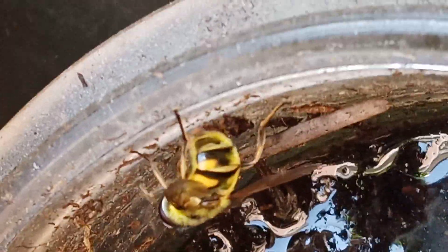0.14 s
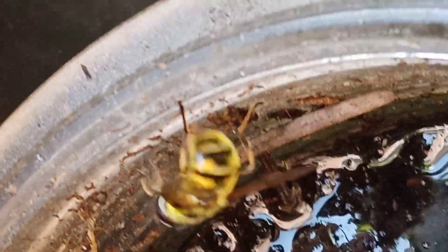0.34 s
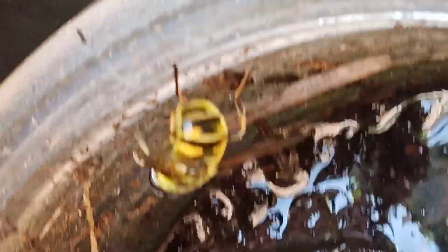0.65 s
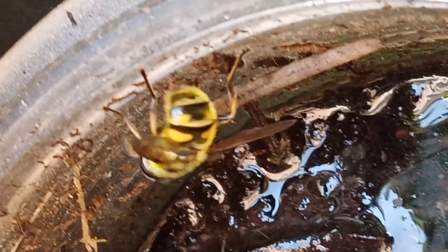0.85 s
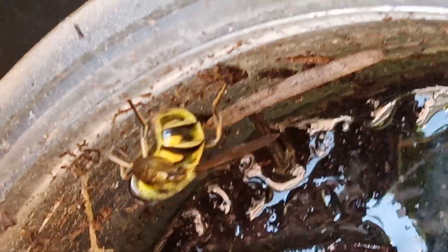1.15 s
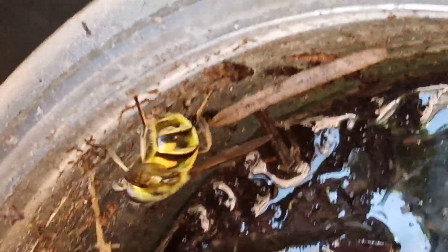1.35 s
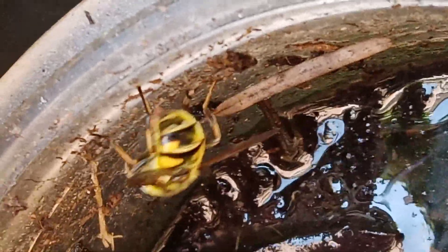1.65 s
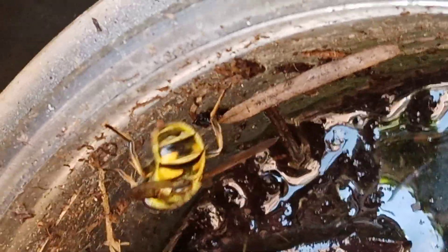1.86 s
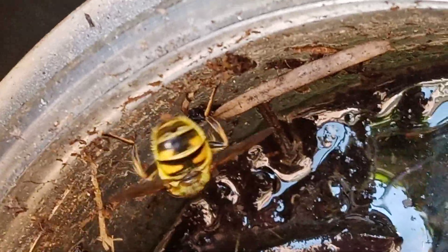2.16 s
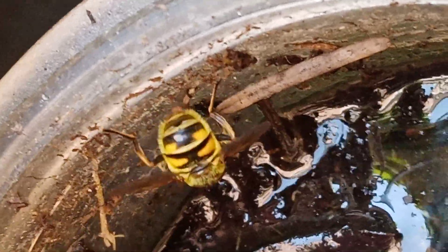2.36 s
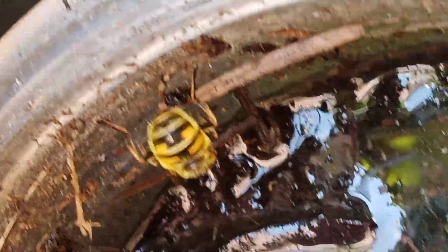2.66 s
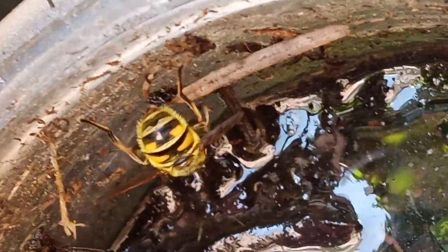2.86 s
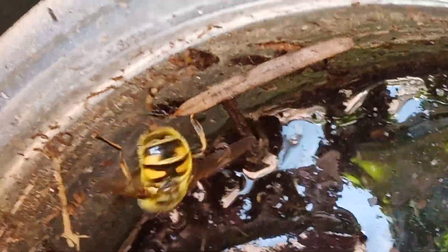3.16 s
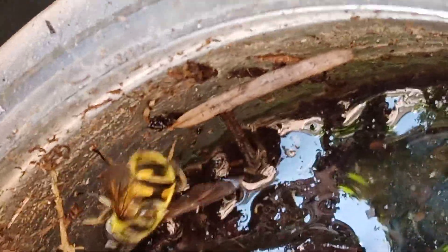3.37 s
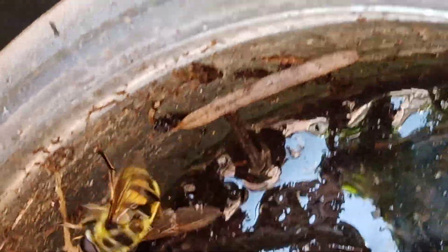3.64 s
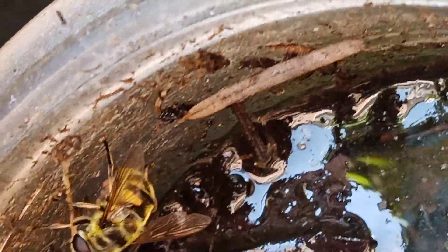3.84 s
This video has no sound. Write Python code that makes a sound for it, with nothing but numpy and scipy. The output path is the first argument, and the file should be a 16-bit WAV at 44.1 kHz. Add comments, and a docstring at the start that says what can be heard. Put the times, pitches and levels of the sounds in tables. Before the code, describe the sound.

An electric machine, perhaps a mower, starts up outdoors. For the first 2.7 seconds, distant traffic and a far engine hum quietly, with faint ticks and rustles close to the microphone. Then the motor jolts on, slightly to the right, rumbling and rattling as its whine rises. Two dull thuds come around 3.4 seconds, and it swells into a loud drone with hissing air by 4 seconds.

```python
"""Distant traffic hums outdoors while a few faint ticks and rustles sound close by. Then an electric
machine, perhaps a mower, starts with a jolt and spins up: its housing rumbles, its gear teeth whine
upwards, a loose panel rattles, its blade settles into a drone and the air it throws swells to a hiss.
The drone and whine are tones that follow the blade's speed; most of the rest is shaped noise."""
import sys
import numpy as np
from scipy import signal
from scipy.fft import rfft, irfft
from scipy.io import wavfile
from scipy.ndimage import uniform_filter1d, map_coordinates

SR = 44100
rng = np.random.default_rng(int(sys.argv[2]) if len(sys.argv) > 2 else 0)


def wav_out(sig):
    """Save sig, one row per channel (or a flat mono array), as 16-bit PCM at SR to the path in sys.argv[1]."""
    wavfile.write(sys.argv[1], SR, np.round(np.clip(np.atleast_2d(sig).T, -1, 1) * 32767).astype(np.int16))


N = 176400
TIME = np.arange(N) / SR

START_S = 2.667  # the machine switches on
MACHINE_LAG_S = 0.00043  # it stands to the right, so the left microphone hears it later
DIRECT = 0.2  # share of its noise that arrives straight from it
# how loud the machine's noises are: t/s, housing rumble/dB, rush of air/dB, hiss/dB
NOISE_LEVELS = [(2.66, -91, -94.5, -115), (2.69, -52, -68, -78), (2.76, -53, -62.5, -83),
                (2.84, -47.5, -58, -78), (2.94, -53, -61, -73), (3.02, -47, -54, -66.5),
                (3.12, -46.5, -54.5, -63), (3.25, -43, -53, -61), (3.41, -35, -48, -57),
                (3.56, -44.5, -49, -55.5), (3.72, -42, -47, -57), (3.87, -44, -46, -55),
                (4.0, -41.5, -45, -55.5)]


def blade(hz, phase):
    """The spinning blade drones and beats the air; both grow with speed."""
    # drone tones: multiple of the blade rate, peak level/dB, f at the peak/Hz, peak width/octaves
    tones = [(1, -38, 107.4, 0.22), (2, -38, 187.6, 0.097), (2, -43, 123, 0.17), (3, -50, 322, 0.041),
             (6, -59, 640, 0.031), (9, -53.5, 950, 0.055)]
    # tone colour of the beaten air: f/Hz, level/dB
    buffet_colour = [(25, -22), (48, -23), (63, -3), (85, -3.5), (120, 2.5), (170, -10), (260, -24),
                     (600, -45)]
    drone = 0
    for multiple, db, peak_hz, octaves in tones:
        gain = undb(db - 0.5 * walk(16)) * swell(multiple * hz, peak_hz, octaves)
        angle = multiple * phase + 0.1 * walk(32) + rng.uniform(0, 2 * np.pi)
        drone += gain * np.sqrt(2) * np.sin(angle)
    buffet_db = -47 + 3 * np.log10(hz / 101.8)  # 3 dB louder for ten times the speed
    buffet = air(colour(buffet_colour), DIRECT) * undb(buffet_db)
    fade_in = uniform_filter1d(1. * (TIME > START_S), size=4000)
    return (drone + buffet) * fade_in


def gears(hz, phase):
    """Gear teeth whine; each tone flares up as it passes a pitch at which the housing rings."""
    # gear tones: multiple of the blade rate, peak level/dB, f at the peak/Hz, peak width/octaves,
    # roughness from 0 to 1
    tones = [(23.5, -48, 260, .22, 0), (24.93, -44, 640, 0.18, 0.34), (26.8, -53, 660, 0.18, 0.57),
             (56.25, -51, 640, 0.17, 0.71), (23.65, -54.5, 1870, 0.047, 0.39), (24.92, -60, 1400, 0.25, .8),
             (25.8, -63.5, 3700, 0.46, 0.5), (25.6, -64.5, 2600, 0.035, 0.35), (27.5, -62, 2970, 0.05, 0.3),
             (36.7, -60.5, 2360, 0.084, 1), (47.4, -63.5, 4720, 0.055, 0.8), (50, -60.5, 3700, 0.35, 0.84),
             (50, -57.5, 4790, 0.058, 0.47), (50, -73, 5350, 0.035, 0.4), (71.1, -69, 4300, .3, 1),
             (73.8, -64, 3500, 0.18, 0.7), (75.7, -62, 4900, 0.085, 0.4), (75.8, -62.5, 6250, 0.11, 0.7),
             (96.8, -69.5, 4000, 0.32, 0.8), (100.8, -69.5, 4700, 0.1, 0.9), (101, -62, 6220, 0.073, 0.74),
             (123.4, -72.5, 5500, .35, 0.88), (146.5, -73.5, 6500, 0.16, 0.9)]
    whine = 0
    for multiple, db, peak_hz, octaves, rough in tones:
        steady = np.sqrt(1 - rough ** 2)
        flutter = 1.57 * rough * (walk(419) + 1j * walk(419)) / np.sqrt(2)
        tone = np.sqrt(2) * np.real((steady + flutter) * np.exp(1j * multiple * phase))
        whine += tone * undb(db + 2.2 * rough * walk(55)) * swell(multiple * hz, peak_hz, octaves)
    return yard(whine * (TIME > START_S), wet=0.4)


def housing():
    """The start jolts the housing and rings its frame; it rumbles and thuds as the speed climbs."""
    # noise bands shaken by the jolt: f/Hz, width/Hz, level/dB
    jolt_bands = [(249, 68, 6), (370, 41, -4.5), (480, 110, -9.5), (623, 120, -9), (980, 300, -16)]
    # the frame's ringing tones: f/Hz, level/dB, decay/s
    frame_tones = [(262, -43, 0.04), (354.4, -46, 0.043), (601, -60, 0.11)]
    # bands in which the housing rumbles: f/Hz, width/Hz, level/dB
    rumble_bands = [(249.3, 56, -1), (338.4, 61, 1), (407.3, 21, -3.5), (580, 80, -16)]
    # dull thuds: t/s, f/Hz, decay/s, level/dB
    thuds = [(3.356, 109, 0.014, -29.5), (3.452, 139, 0.017, -30)]
    rise_s, jolt_decay_s = 0.029, 0.048
    age = TIME - START_S
    rise = np.clip(age / rise_s, 0, 1)
    after_peak = np.maximum(age - rise_s, 0)
    jolt = air(resonances(jolt_bands), DIRECT) * np.exp(-after_peak / jolt_decay_s) * undb(-42.5)
    ring = sum(undb(db) * np.sqrt(2) * np.sin(2 * np.pi * hz * age) * np.exp(-after_peak / decay)
               for hz, db, decay in frame_tones)
    rumble = air(resonances(rumble_bands), DIRECT) * undb(curve(NOISE_LEVELS))
    return rumble + knocks(thuds) + (jolt + ring) * rise


def thrown_air(phase):
    """Thrown air rushes and hisses, chopped at each pass of the blade."""
    # tone colours of the low rush and the high hiss: f/Hz, level/dB
    rush_colour = [(150, -31), (400, -4), (520, 1.5), (700, -3), (810, -8), (980, -5), (1400, -7),
                   (1750, -14), (2250, -18.5), (3000, -30.5), (6000, -56)]
    hiss_colour = [(1200, -38), (2300, -1.5), (3200, 4), (4600, 2), (5800, 1.5), (7300, -3), (8700, 1),
                   (10500, -4.5), (12500, -13.5), (13800, -19), (14600, -3), (15200, -4), (15800, 6)]
    rush = air(colour(rush_colour), DIRECT) * undb(curve(NOISE_LEVELS, column=2) + walk(30))
    hiss = air(colour(hiss_colour), DIRECT) * undb(curve(NOISE_LEVELS, column=3) + .5 * walk(30))
    chop = 0.12 * np.cos(phase)
    return rush * pan(-2) * (1 + chop) + hiss * pan(1.5) * (1 + chop / 2)


def panel(hz):
    """A loose panel rings in fits while the blade rate passes through the range that shakes it."""
    # the panel's ringing bands: f/Hz, width/Hz, level/dB
    bands = [(397.7, 12, -1.5), (2217, 150, -19.5)]
    peak_hz, octaves = 49, 0.68
    shaken = np.exp(-.5 * (np.log2(hz / peak_hz) / octaves) ** 2)
    return air(resonances(bands), DIRECT) * shaken * undb(-53.5 + 2.5 * walk(45))


def close_by():
    """Tiny ticks, a soft knock and rustles with a grainy scrape near the microphones."""
    # ticks: t/s, f/Hz, width/Hz, decay/s, level/dB
    tick_events = [(.19, 8800, 3000, .03, -88), (0.589, 5000, 3000, 0.026, -83),
                   (1.245, 8350, 500, .02, -89), (1.254, 5400, 1200, 0.013, -81.5),
                   (1.315, 8460, 800, 0.022, -88), (1.689, 2600, 2500, .012, -78.5),
                   (2.218, 8400, 3020, 0.027, -82.5)]
    # the knock: t/s, f/Hz, decay/s, level/dB
    knock = [(.426, 625, 0.013, -57.5)]
    # rustles: t/s, half-length/s, low rustle/dB, scrape/dB
    rustles = [(0.178, 0.049, -69, -92), (0.493, 0.078, -66.5, -88.5), (0.607, 0.055, -68, -88),
               (0.73, 0.062, -60.5, -86.5), (0.882, 0.14, -71, -88.5), (1.34, .1, -76, -97),
               (2.483, 0.057, -62, -92), (2.575, 0.053, -63.5, -88)]
    # tone colours of the low rustle and its scrape: f/Hz, level/dB
    rustle_colour = [(100, -21), (200, 2.5), (300, 5.5), (420, -3.5), (560, -10), (1200, -11),
                     (2500, -32.5)]
    scrape_colour = [(2500, -2.5), (4500, -3), (7200, -6.5), (8500, 2), (9500, -3), (11000, -10),
                     (16000, -17)]
    ticks = 0
    for start, hz, width, decay, db in tick_events:
        fade = (TIME > start) * np.exp(-np.abs(TIME - start) / decay)
        ticks += air(resonances([(hz, width, 0)])) * undb(db) * fade
    rustle_gain, scrape_gain = sum(undb([[low_db], [scrape_db]]) * np.exp(-((TIME - at) / span) ** 2)
                                   for at, span, low_db, scrape_db in rustles)
    rustle = air(colour(rustle_colour)) * rustle_gain * undb(2 * walk(45))
    scrape = air(colour(scrape_colour)) * scrape_gain * undb(1.5 * walk(110))
    return ticks + knocks(knock) + rustle + scrape


def traffic():
    """Distant traffic: a throbbing low hum, and tyres murmuring in bands that swell and fade."""
    # tone colour of the road: f/Hz, level/dB
    road_colour = [(25, -36.5), (37, -31.5), (48, -19.5), (62, -2.5), (76, -0.5), (102, -1.5), (134, 0),
                   (151, -6.5), (170, -9.5), (211, -23.5), (295, -21), (345, -26), (450, -31.5),
                   (544, -31.5), (900, -28.5), (1200, -28), (1450, -32.5), (1700, -37.5), (2000, -41.5),
                   (2800, -52), (3600, -56.5)]
    # the tyres' murmur: f/Hz, width/Hz, level/dB
    murmur_bands = [(865, 64, -80.5), (986, 110, -80.5), (1176, 150, -79.5), (1365, 130, -81)]
    # slow rise and fall of tyres and hum: t/s, level change/dB
    tyre_level = [(0, 0), (.3, 0), (.8, 0.5), (1.5, -1), (2.1, -1), (2.6, 2), (4.0, -1)]
    hum_level = [(0, -2.5), (.17, 4), (.32, -1.5), (.75, -2.5), (.95, -3), (1.15, 2.5), (1.5, -1),
                 (1.85, -1.5), (2.05, 1.5), (2.18, -1.5), (2.3, -0.5), (2.6, 3), (4.0, 0)]
    road = air(colour(road_colour)) * undb(-52)
    hum = irfft(rfft(road) / (1 + (bins() / 240) ** 8), N)  # the part below 240 Hz
    murmur = sum(air(resonances([(hz, width, 0)])) * undb(db + 3.2 * walk(8.73))
                 for hz, width, db in murmur_bands)
    tyres = (road - hum + murmur) * undb(curve(tyre_level) + 0.56 * walk(6))
    return hum * undb(curve(hum_level) + 2.5 * walk(21.81)) + tyres


def far_engine():
    """One far engine hums a low, wavering tone."""
    # its pitch and loudness: t/s, f/Hz, level/dB
    course = [(0, 146, -57), (.4, 141, -59), (.75, 135, -58.5), (1.0, 132, -57), (1.25, 128, -56),
              (1.6, 130, -59.5), (2.2, 137, -62.5), (4.0, 130, -54.5)]
    phase = 2 * np.pi * np.cumsum(curve(course)) / SR
    return np.sqrt(2) * np.sin(phase + .5 * walk(12)) * undb(curve(course, column=2) + 2 * walk(12))


def still_air():
    """A thin, steady hiss lies behind everything."""
    # its tone colour: f/Hz, level/dB
    hiss_colour = [(1500, 1), (2800, -1), (4500, 0), (7000, -7.5), (8700, -3.5), (12500, -3), (14000, -4),
                   (15000, 9), (15800, 2.5)]
    return air(colour(hiss_colour)) * undb(-87.5)


def knocks(rows, rise_s=0.0033):
    """Soft blows that each ring one short tone."""
    out = 0
    for start, hz, decay, db in rows:
        age = np.maximum(TIME - start, 0)
        envelope = np.exp(-age / decay) * (1 - np.exp(-age / rise_s))
        out += undb(db) * np.sin(2 * np.pi * hz * age) * envelope
    return out


def air(gain, direct=0):
    """Shaped stereo noise of strength 1: a direct share from the right, the rest from all sides."""
    mic_gap_s = 0.00051  # sound's travel time between the microphones
    around = .97 * np.sinc(2 * bins() * mic_gap_s)  # alike on both sides only in the bass
    alike = (1 - direct) * around + direct * np.exp(-2j * np.pi * bins() * MACHINE_LAG_S)
    right, other = rfft(rng.standard_normal((2, N)))
    left = alike * right + np.sqrt(np.maximum(1 - np.abs(alike) ** 2, 0)) * other
    noise = irfft(np.array([left, right]) * gain, N)
    return noise / np.sqrt(np.mean(noise ** 2))


def yard(x, wet, echo_s=0.092):
    """Sound arrives from the right, then echoes off ground and walls; wet is the echoes' share."""
    t = TIME[:SR // 4]
    tail = rng.standard_normal((2, len(t))) * np.exp(-np.log(1000) * t / echo_s)
    tail /= np.sqrt(np.sum(tail ** 2, axis=1, keepdims=True))
    echoes = signal.fftconvolve(x[None], tail, axes=1)[:, :N]
    left = map_coordinates(x, [(TIME - MACHINE_LAG_S) * SR], mode="nearest")
    return np.sqrt(1 - wet) * np.array([left, x]) + np.sqrt(wet) * echoes


def swell(hz, peak_hz, octaves):
    """Gain of a gliding tone, greatest as it passes peak_hz."""
    return 1 / (1 + .5 * (np.log2(hz / peak_hz) / octaves) ** 2)


def resonances(rows):
    """Gain at each frequency for something that rings in narrow bands."""
    f = bins()
    return sum(undb(db) / (1 + ((f / hz - hz / f) * hz / width) ** 2) for hz, width, db in rows)


def colour(points):
    """Gain through (f/Hz, level/dB) points, falling steeply outside them."""
    hz, db = np.array(points, float).T
    f = bins()
    roll_off = np.minimum(f / hz[0], 1) ** 2 * np.minimum(hz[-1] / f, 1) ** 4
    return undb(np.interp(np.log(f), np.log(hz), db)) * roll_off


def bins():
    """The spectrum's frequencies in Hz."""
    return np.maximum(np.arange(N // 2 + 1) * SR / N, 1)


def walk(rate_hz):
    """A smooth random wobble, about 1 in size."""
    hold = int(SR / rate_hz)
    steps = np.repeat(rng.standard_normal(N // hold + 1), hold)
    return 1.3 * uniform_filter1d(uniform_filter1d(steps, hold), hold)[:N]


def curve(rows, column=1):
    """One column of a table, joined by straight lines in time."""
    rows = np.array(rows, float)
    return np.interp(TIME, rows[:, 0], rows[:, column])


def pan(db):
    """Gains that make the left side db louder than the right."""
    return undb(db * np.array([[.5], [-.5]]))


def undb(db):
    """Turn decibels into a gain."""
    return 10 ** (np.asarray(db) / 20)


def scene():
    """One rising speed drives blade, gears, panel and the air's chop, over the outdoor sounds."""
    # blade passes per second: t/s, f/Hz
    blade_rate = [(2.67, 2), (2.85, 11), (3.0, 23), (3.1, 31), (3.2, 41.1), (3.25, 47.1), (3.34, 59.9),
                  (3.4, 67.8), (3.5, 79.6), (3.6, 92), (3.7, 99.4), (3.8, 104), (3.9, 106.4), (4.0, 107.6)]
    hz = curve(blade_rate)
    phase = 2 * np.pi * np.cumsum(hz) / SR
    machine = blade(hz, phase) + gears(hz, phase) + panel(hz) + housing() + thrown_air(phase)
    background = far_engine() + traffic() + still_air()
    return machine + background + close_by()


def record(dry):
    """Each microphone colours the sound its own way; both ends fade and the highest treble is cut."""
    # balance of the microphones: f/Hz, left minus right/dB
    balance = [(50, -2.5), (105, 3.5), (150, -4), (205, -8), (290, -1.5), (490, -2.5), (660, 5.5), (850, 0),
               (1300, -1.5), (1800, 0), (2900, 0.5), (4500, -3), (6400, -6), (7200, -2.5), (8300, 10.5),
               (10500, 2.5), (13000, 0.5), (15500, -3)]
    hz, db = np.array(balance, float).T
    mic_gains = pan(np.interp(np.log(bins()), np.log(hz), db))
    fades = signal.windows.tukey(N, .003)
    heard = irfft(rfft(dry * fades) * mic_gains, N)
    treble_cut = signal.ellip(12, .2, 80, 15800, fs=SR, output="sos")
    return signal.sosfilt(treble_cut, heard)


dry = scene()
out = record(dry)
wav_out(out)
```